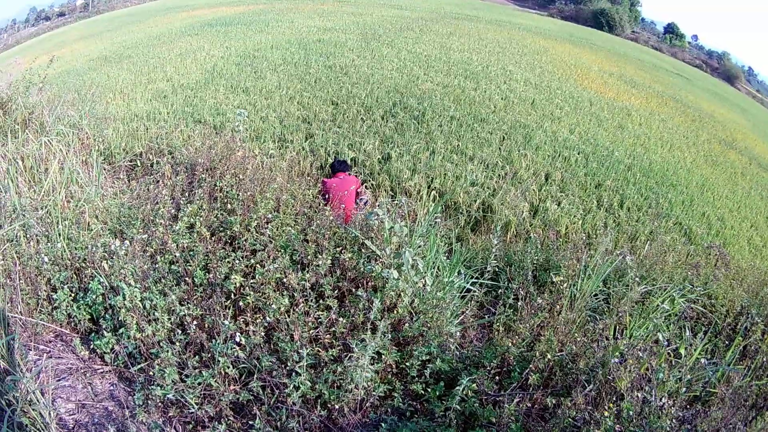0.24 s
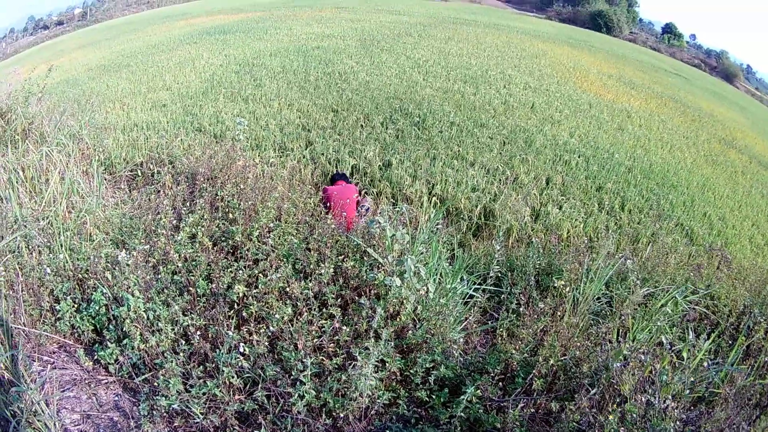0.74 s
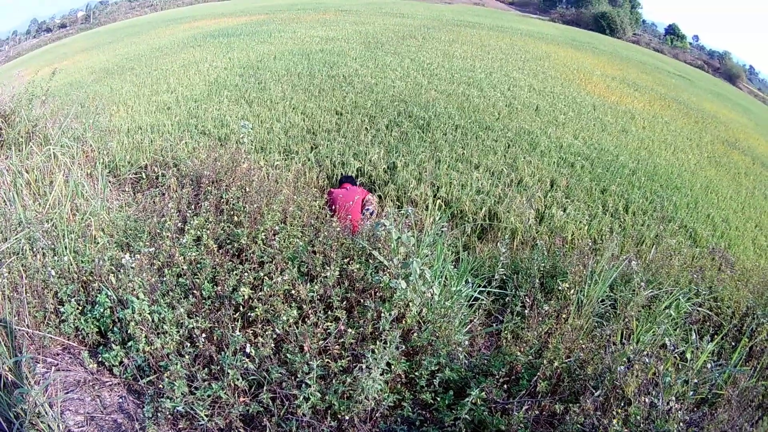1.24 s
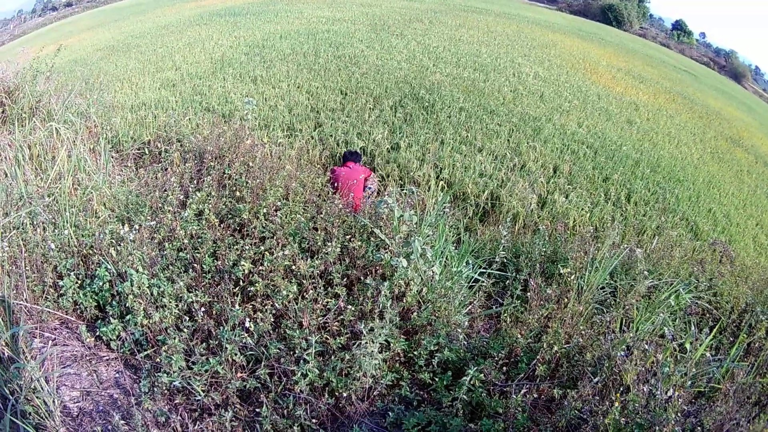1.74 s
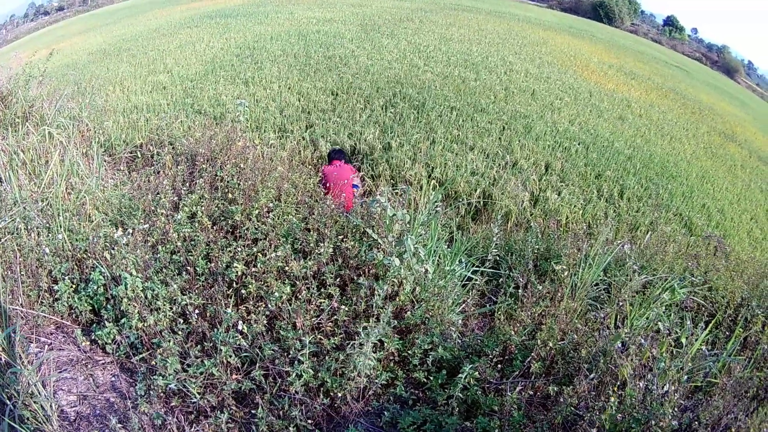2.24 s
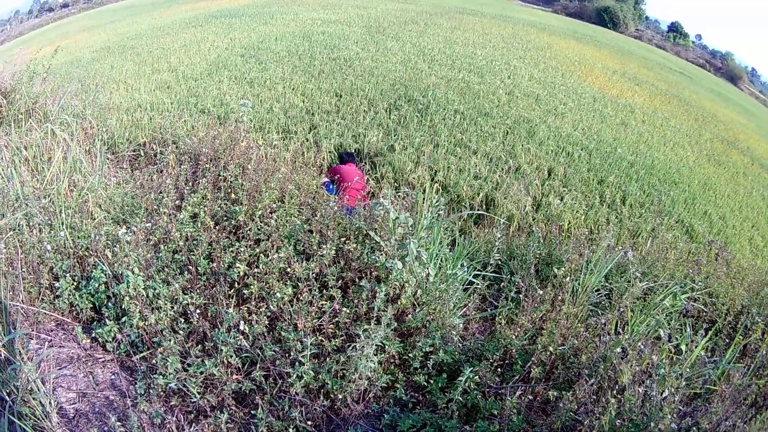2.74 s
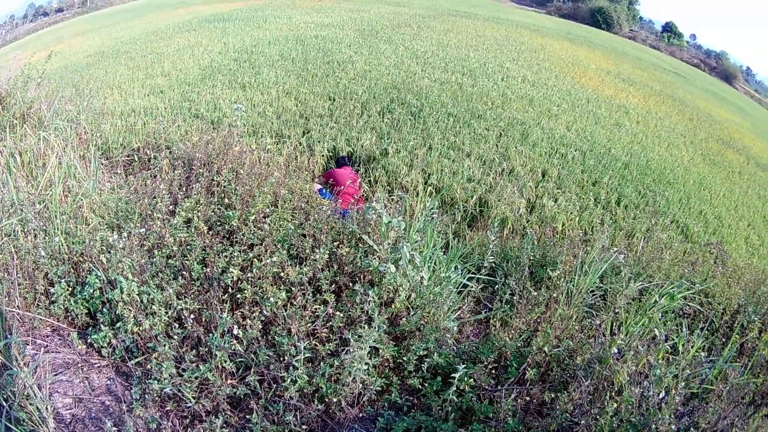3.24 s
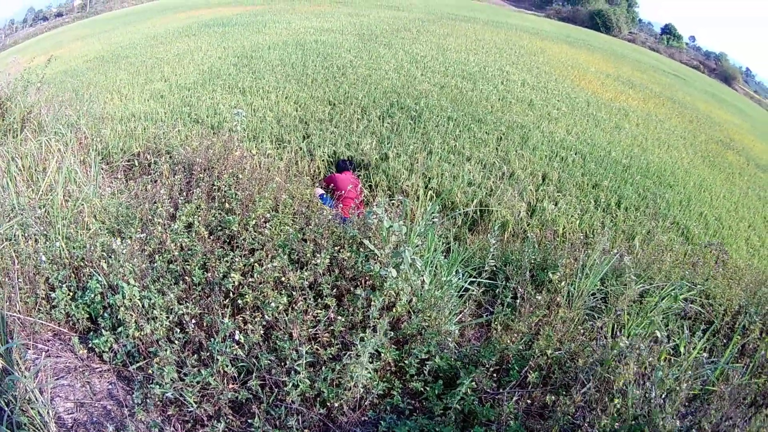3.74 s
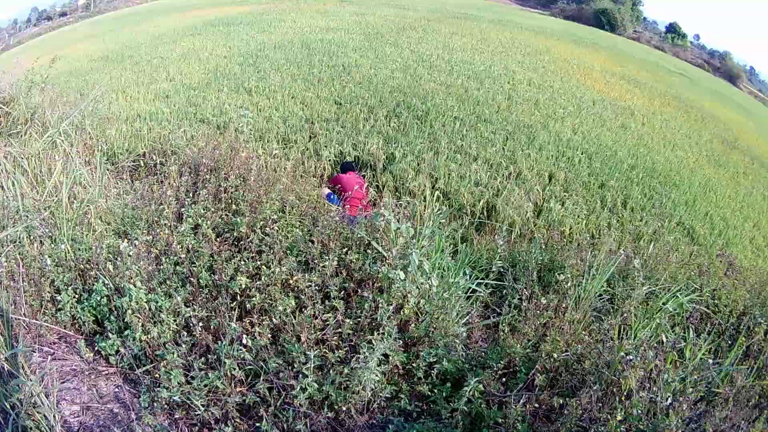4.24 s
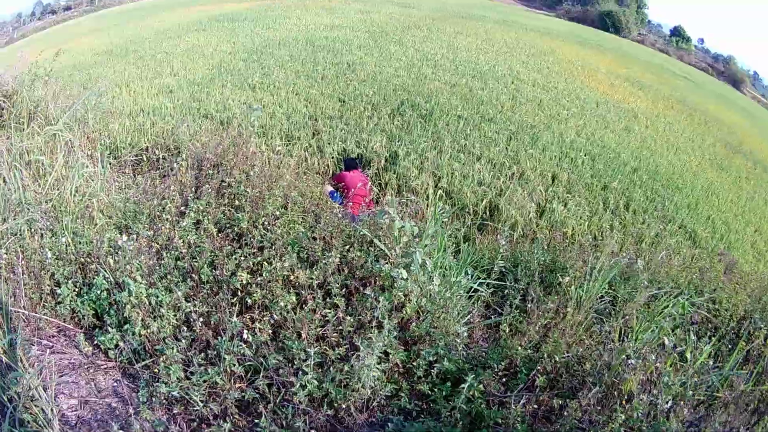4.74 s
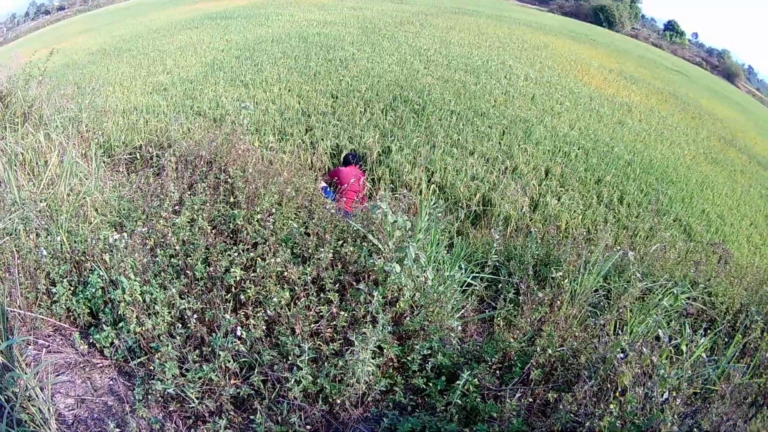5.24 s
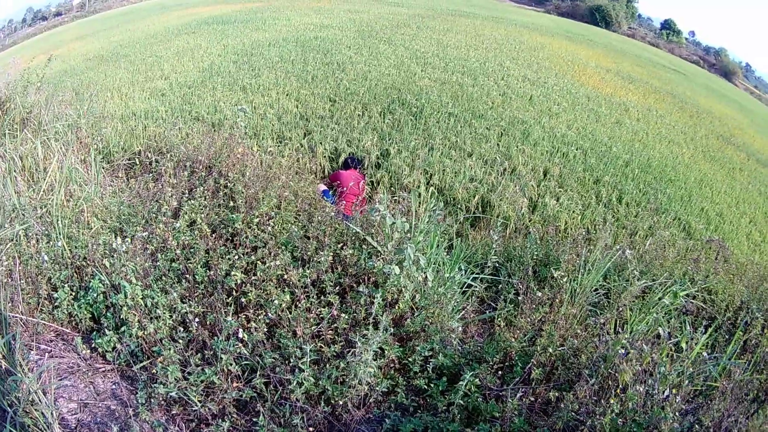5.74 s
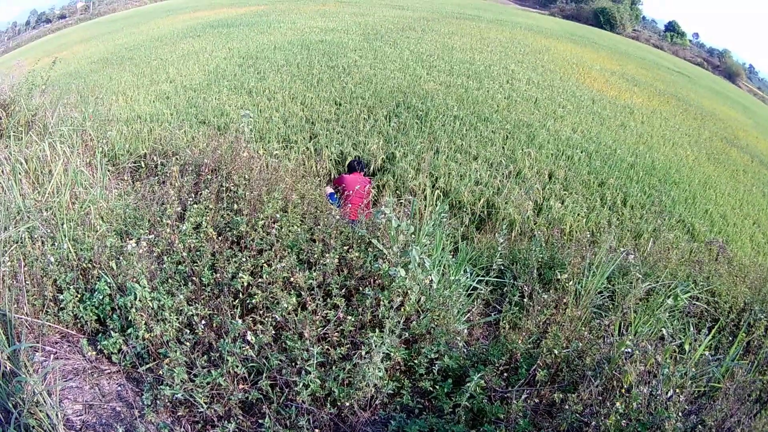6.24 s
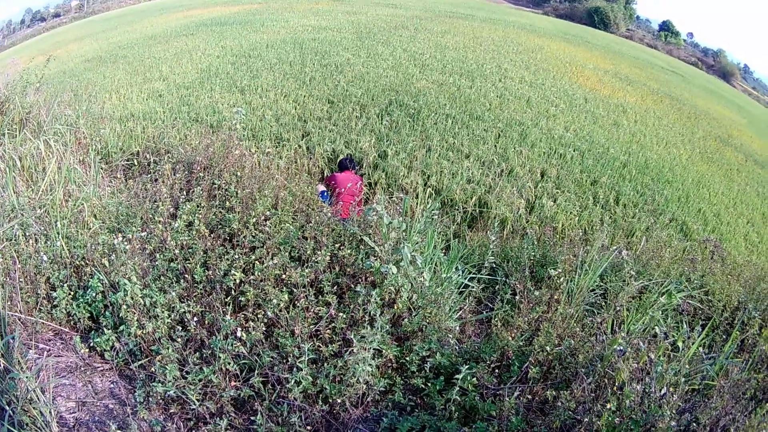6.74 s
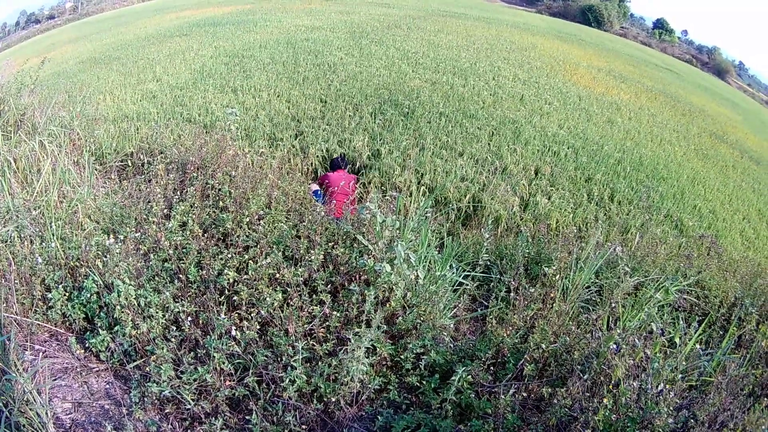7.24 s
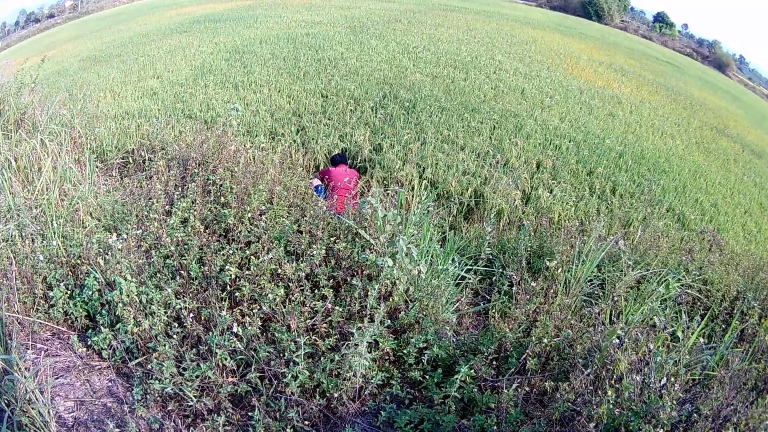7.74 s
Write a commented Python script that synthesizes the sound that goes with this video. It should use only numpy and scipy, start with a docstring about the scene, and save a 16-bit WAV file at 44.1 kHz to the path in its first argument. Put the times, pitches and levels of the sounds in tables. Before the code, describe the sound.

Close, bassy wind buffeting comes in short irregular bursts, with rounded pressure thumps and brief spits of rasping air. After the strong middle it thins out, letting faint high bird ticks, a few weak peeps and soft distant hoots show through. A thin wavering far tone rises near the end. Outdoors beside a grain field, on a small dull-sounding mono microphone.

```python
"""From the start, gusty wind over a rice field rumbles, flutters and rasps on a small camera microphone: filtered noise.
Under it lie the hush of the field and a faint rustle of stalks made of tiny clicks; far hoots slide in now and then.
A small bird ticks, mostly in pairs, as short falling notes. Soon single vortices thump as rounded pressure
peaks and grainy spits of air rasp at the port. A second bird peeps midway and later,
and near the end a thin, wavering far tone comes up.
"""
import sys
import numpy as np
from scipy import signal
from scipy.fft import rfft, irfft, next_fast_len
from scipy.io import wavfile
from scipy.ndimage import uniform_filter1d

SR = 44100
rng = np.random.default_rng(int(sys.argv[2]) if len(sys.argv) > 2 else 0)


def to_wav(sig):
    """Store sig (one row per channel, or 1-D mono) as 16-bit WAV at the path in sys.argv[1].

    Samples outside -1..1 are clipped; the rate is SR.
    """
    pcm = np.clip(np.atleast_2d(sig), -1, 1) * 32767
    pcm = np.round(pcm).astype(np.int16)
    wavfile.write(sys.argv[1], SR, pcm.T)  # frames by channels


N = 352359


def undb(db):
    """Decibels to amplitude gain."""
    return 10 ** (np.asarray(db) / 20)


def unit(x):
    """Scale to rms 1."""
    return x / np.sqrt(np.mean(x ** 2) + 1e-30)


def curves(table):
    """The columns of a table, joined by straight lines in time."""
    time_s, *columns = np.transpose(table)
    return [np.interp(np.arange(N) / SR, time_s, column) for column in columns]


def colour(x, spectrum):
    """Filter by a spectrum of (frequency [Hz], gain [dB]) points, joined along log frequency."""
    hz, db = np.transpose(spectrum)
    size = next_fast_len(len(x))
    bins_hz = np.maximum(np.arange(size // 2 + 1) * SR / size, 1)
    gain = undb(np.interp(np.log(bins_hz), np.log(hz), db))
    return irfft(rfft(x, size) * gain, size)[:len(x)]


def cut(x, hz, kind, order=2):
    """Low- or high-pass run forwards and backwards, so nothing is delayed."""
    sos = signal.butter(order, min(hz, SR / 2 - 1), kind, fs=SR, output="sos")
    return signal.sosfiltfilt(sos, x, padtype="even")


def walk(rate):
    """Random levels, `rate` new ones a second, smoothed twice; rms 1."""
    hold = max(int(SR / rate), 2)
    steps = np.repeat(rng.standard_normal(N // hold + 1), hold)
    return unit(uniform_filter1d(uniform_filter1d(steps, hold), hold)[:N])


def steady(x, span_s):
    """Hold the rms near 1 over about span_s, keeping the faster texture."""
    k = max(int(span_s * SR), 2)
    power = uniform_filter1d(uniform_filter1d(x ** 2, k), k)
    return x / np.sqrt(power + 1e-30)


def add(out, start_s, sound):
    """Mix a short sound in at a time."""
    i = int(np.clip(start_s * SR, 0, N - 1))
    out[i:i + len(sound)] += sound[:N - i]


def scatter(x, decay_s):
    """Diffuse reflections off the crop and the far trees: a decaying noise tail of unit energy."""
    age = np.arange(SR // 2) / SR
    tail = rng.standard_normal(len(age)) * np.exp(-age / decay_s)
    return signal.oaconvolve(x, tail / np.linalg.norm(tail))[:N]


def swell(start_s, length_s, attack_s=0.0082, release_s=0.0097):
    """The envelope of a gust, roll or lull: it rises, holds and drops away along tanh slopes."""
    out, begin_s = np.zeros(N), max(start_s - 0.1, 0)
    t = np.arange(begin_s - start_s, length_s + 0.1, 1 / SR)
    rise = (1 + np.tanh(t / attack_s / 2)) / 2
    drop = (1 + np.tanh((length_s - t) / release_s / 2)) / 2
    add(out, begin_s, (rise * drop) ** 2)
    return out


# The breeze between gusts: (time [s], flutter level [dB], rumble level [dB])
BREEZE_LEVELS = [(0.0, -53.5, -47.5), (0.3, -57, -49), (0.55, -51.5, -41), (0.92, -57, -46.5),
                 (1.22, -52.5, -44), (1.72, -58.5, -48.5), (1.95, -51, -41), (2.28, -49.5, -43),
                 (2.8, -41.5, -48), (2.95, -50, -41.5), (3.3, -42.5, -42), (3.85, -49.5, -45),
                 (4.4, -51, -56), (4.52, -52.5, -56.5), (4.64, -60, -50.5), (5.3, -61, -47),
                 (5.7, -58.5, -49), (6.9, -62, -45), (7.99, -60, -52)]
# Large slow eddies that only rumble: (start [s], length [s], level [dB])
SLOW_ROLLS = [(-0.005, 0.078, -41.5), (0.524, 0.17, -42.5), (0.664, 0.15, -37), (0.965, 0.073, -37.5),
              (1.205, 0.036, -39), (1.334, 0.049, -39), (2.33, 0.022, -29), (2.42, 0.11, -37),
              (2.963, 0.21, -40), (3.332, 0.19, -37), (3.695, 0.27, -40), (4.342, 0.032, -34.5),
              (4.41, 0.09, -40), (4.902, 0.12, -43), (5.103, 0.13, -40), (5.581, 0.032, -36.5),
              (5.744, 0.055, -40), (6.095, 0.11, -45), (6.3, 0.03, -43), (7.416, 0.22, -42.5)]
# Gusts that cross the port: (start [s], length [s], flutter level [dB], extra rasp [dB])
PORT_GUSTS = [(0.009, 0.074, -49, -6), (0.39, 0.052, -48, -4), (0.428, 0.023, -40.5, 0),
              (0.531, 0.16, -50.5, 6.5), (0.657, 0.11, -41.5, -1), (0.776, 0.1, -49, -6),
              (0.985, 0.2, -48.5, -3), (1.324, 0.12, -54, 4), (1.475, 0.27, -52.5, 4),
              (1.758, 0.11, -46.5, -6), (2.043, 0.069, -53.5, 15), (2.316, 0.25, -45, 2.5),
              (2.575, 0.203, -47, 8), (3.07, 0.57, -49.5, 4.5), (3.356, 0.075, -41.5, 1.5),
              (3.59, 0.15, -43.5, 2), (3.726, 0.051, -34.5, -2), (3.883, 0.18, -45.5, -0.5),
              (4.094, 0.2, -47, 0), (4.304, 0.11, -41.5, -4.5), (4.622, 0.033, -54, 7),
              (4.784, 0.14, -49, -3), (5.033, 0.057, -46, -5), (5.114, 0.079, -49, -6),
              (5.36, 0.18, -58.5, -8), (5.85, 0.12, -52.5, -7.5), (5.991, 0.14, -48, -12),
              (6.301, 0.034, -49.5, -8), (6.728, 0.021, -42.5, -5.5), (6.759, 0.22, -49.5, -7),
              (7.06, 0.098, -49, -4.5), (7.171, 0.11, -50, -6), (7.366, 0.18, -50, -13),
              (7.629, 0.11, -51.5, -9), (7.854, 0.17, -52, -15)]
# Sudden lulls; small eddies often die while large ones roll on, and a few parts rise:
# (start [s], length [s], flutter change [dB], rumble change [dB])
SUDDEN_LULLS = [(0.104, 0.11, -5, 2.5), (0.274, 0.12, -3.5, 0.5), (0.88, 0.041, -3, 0),
                (1.27, 0.049, -1, -12), (1.697, 0.04, -13, -10), (1.962, 0.07, -8, -3.5),
                (2.175, 0.044, -2, 3), (2.928, 0.045, -6, -8), (3.56, 0.038, -6.5, -12),
                (3.854, 0.033, -5, -3), (4.05, 0.05, 3.5, -11), (4.563, 0.12, -2, -2),
                (4.943, 0.041, -1, 3), (5.01, 0.022, 1, -2), (5.205, 0.12, 2, -1.5), (5.624, 0.2, -5, -3.5),
                (6.22, 0.09, -3.5, -3), (6.386, 0.14, -3, -5), (7.01, 0.045, -2, -1.5),
                (7.277, 0.049, -6, -1), (7.78, 0.064, -5.5, 1)]


def airflow(breakup=0.46):
    """Rumble, flutter and rasp levels in dB: gusts add power to the breeze, lulls shift it.
    A raspy gust has broken up its large eddies, so it rumbles less."""
    moderate_db = -50  # flutter of a moderate wind, where the two levels below apply
    gust_rumble_db, rumble_slope = -53, 0.89  # slopes: dB gained per dB of flutter
    base_rasp_db, rasp_slope = -64, 0.87
    flutter, rumble = undb(curves(BREEZE_LEVELS)) ** 2  # powers
    extra_rasp = 0
    for start_s, length_s, db, extra_db in PORT_GUSTS:
        shape = swell(start_s, length_s)
        gust_power = shape * undb(db) ** 2
        rumble_db = gust_rumble_db + rumble_slope * (db - moderate_db) - breakup * extra_db
        flutter = flutter + gust_power
        rumble = rumble + shape * undb(rumble_db) ** 2
        extra_rasp = extra_rasp + gust_power * extra_db
    for start_s, length_s, db in SLOW_ROLLS:
        rumble = rumble + swell(start_s, length_s) * undb(db) ** 2

    flutter_db, rumble_db = 10 * np.log10(flutter), 10 * np.log10(rumble)
    for start_s, length_s, flutter_change_db, rumble_change_db in SUDDEN_LULLS:
        shape = swell(start_s, length_s)
        flutter_db = flutter_db + shape * flutter_change_db
        rumble_db = rumble_db + shape * rumble_change_db
    # extra rasp is averaged over the gusts and breeze by their share of flutter power
    rasp_db = base_rasp_db + rasp_slope * (flutter_db - moderate_db) + extra_rasp / flutter
    return rumble_db, flutter_db, rasp_db


# Relative spectrum of the turbulence: (frequency [Hz], density [dB per Hz])
EDDY_SPECTRUM = [(8.8, -33), (15, -4), (36, 1.5), (68, 3), (116, -1.5), (258, -9), (412, -14.5),
                 (1460, -42), (3050, -63.5), (3960, -80), (6710, -120)]


def wind(rumble_db, flutter_db, rasp_db, span_s=0.05):
    """Turbulence on the port: large eddies break up into small ones, which come in short bursts."""
    rumble_top_hz, flutter_top_hz, deep_top_hz = 145.2, 623, 85.5
    burst_db, burst_rate = 3, 70  # spread, new levels per second
    spike_db, spike_rate = 0.5, 350
    shared, unrest_rate = 0.13, 22  # how far small eddies follow large ones; new levels per second
    slack_db, slack_slope = -3.5, 0.38

    pressure = colour(rng.standard_normal(N), EDDY_SPECTRUM)
    rumble = cut(pressure, rumble_top_hz, "low", order=3)
    rasp = cut(pressure, flutter_top_hz, "high", order=3)
    flutter = pressure - rumble - rasp
    rumble = steady(rumble, span_s)

    # small eddies are shed where a large one is strong, and add faster bursts of their own
    shedding = (uniform_filter1d(rumble ** 2, SR // 150) + 0.054) ** (shared / 2)
    bursts = shedding * undb(burst_db * walk(burst_rate))
    spikes = bursts * undb(spike_db * walk(spike_rate))
    unrest = walk(unrest_rate)

    # the further flutter falls under rumble, the more only the deepest eddies remain
    deep = cut(rumble, deep_top_hz, "low", order=3)
    thinning_db = slack_slope * np.minimum(flutter_db - rumble_db - slack_db, 0)
    rumble = deep + (rumble - deep) * undb(thinning_db)

    # each band: level, fixed trim, random unrest
    rumble_gain = undb(rumble_db + 0.96 + 1.57 * walk(unrest_rate))
    flutter_gain = undb(flutter_db - 2.0 + 1.0 * unrest)
    rasp_gain = undb(rasp_db + 0.38 - 0.2 * unrest)
    return (rumble * rumble_gain
            + steady(flutter * bursts, span_s) * flutter_gain
            + steady(rasp * spikes, span_s) * rasp_gain)


# Relative spectrum of the open field between gusts: (frequency [Hz], density [dB per Hz])
FIELD_SPECTRUM = [(40, 1.5), (200, -0.5), (500, -9), (900, -12), (1500, -12.5), (2200, -18.5), (3200, -24),
                  (4500, -26.5), (5600, -28), (7000, -30.5), (8000, -32), (12400, -32.5)]


def field(level_db=-70, flicker_db=1.4, hiss_hz=2000):
    """The hush of the whole crop and the far country swells a little, over a faint even hiss."""
    hush = unit(colour(rng.standard_normal(N), FIELD_SPECTRUM)) * undb(level_db)
    far = cut(hush, hiss_hz, "low")
    hiss = hush - far
    return far * undb(flicker_db * walk(3.4)) + hiss


def stalks(wind_db, clicks_per_s=2500, scatter_db=3, rustle_db=-89, follow=.8):
    """Dry leaves touch in countless tiny clicks, louder while a gust bends them."""
    push_db = uniform_filter1d(wind_db, SR // 5)
    touches = rng.random(N) < clicks_per_s / SR
    strength = undb(scatter_db * np.minimum(rng.exponential(size=N), 4))
    clicks = touches * rng.standard_normal(N) * strength
    leaves = colour(clicks, [(800, -10.5), (2500, -4.0), (4200, 6.0), (6500, -4), (9000, -20.0), (12000, -27.5)])
    # rustle_db holds at the strongest push
    return unit(leaves) * undb(rustle_db + follow * (push_db - push_db.max()))


# Distant hoots: (start [s], length [s], starting pitch [Hz], end pitch [Hz], peak level [dB] before roughness)
HOOT_CALLS = [(0.058, 0.05, 905, 940, -59.5), (4.63, 0.17, 870, 885, -73.5), (6.79, 0.065, 890, 935, -60),
              (7.152, 0.078, 810, 935, -57.5), (7.495, 0.075, 750, 623, -63.5)]


def hoots(waver=0.028, rough_db=3, echo_db=-6, echo_s=0.063):
    """Far calls, slightly hoarse sines, that slide to a pitch and linger over the field."""
    out, unrest = np.zeros(N), 1 + waver * walk(150)
    for start_s, length_s, start_hz, end_hz, db in HOOT_CALLS:
        u = np.linspace(0, 1, int(length_s * SR))
        slide_hz = start_hz + (end_hz - start_hz) * np.sin(np.pi / 2 * u)
        hz = slide_hz * unrest[int(start_s * SR):][:len(u)]
        tone = np.sin(2 * np.pi * np.cumsum(hz) / SR)
        add(out, start_s, undb(db) * np.sin(np.pi * u) * tone)
    out = out * undb(rough_db * walk(200))
    return out + undb(echo_db) * scatter(out, echo_s)


NOTE_LEAD_S = .02  # from the start of a note's frame to its centre


def note(hz, width_s, fall, rough):
    """A 40 ms frame holding one tiny falling note whose pitch and strength tremble."""
    t = np.arange(-SR // 50, SR // 50) / SR
    tremble = unit(cut(rng.standard_normal(len(t)), 730, "low"))
    falling_hz = hz * (1 - fall * np.tanh(t / width_s / 2))
    phase = 2 * np.pi * np.cumsum(falling_hz) / SR
    strength = np.exp(-(t / width_s) ** 2 / 2) * (1 + rough / 2 * tremble[::-1])
    return strength * np.sin(phase + rough * tremble)


def over_crop(calls, echo_db=-10, echo_s=0.024, top_hz=7700):
    """The crop scatters bird calls into a short tail; a steep low-pass dulls them."""
    return cut(calls + undb(echo_db) * scatter(calls, echo_s), top_hz, "low", order=10)


# The ticking bird's calls: (time [s], first tick's level [dB], gap to the second tick [s], 0 = a lone tick,
# second tick's level [dB]); levels before each part's own trim
TICK_CALLS = [(0.089, -78.5, .18, -77), (0.588, -70.5, .177, -73), (1.287, -67.5, .178, -69),
              (2.138, -66.5, .188, -67.5), (2.642, -67.5, .193, -68), (3.312, -68, .188, -68.5),
              (4.041, -72, 0, -99), (4.758, -70.5, .194, -72.5), (5.608, -76, 0, -99),
              (6.204, -70, .188, -74), (6.826, -74.5, .187, -77.5), (7.542, -76.5, .18, -72.5)]


def ticks():
    """Every tick as (time s, level dB, pitch Hz); the pitch sags slowly from call to call."""
    for time_s, db, gap_s, second_db in TICK_CALLS:
        hz = 4960 - 42 * time_s  # sags 42 Hz per second
        yield time_s, db, hz
        if gap_s > .1:
            yield time_s + gap_s, second_db, hz


def ticking_bird(upper_ratio=1.41, upper_db=-2, trail_db=-7, lower_db=0.6, lag_s=.0053):
    """Each tick is a rough high chip, then its faint trail together with a shorter, lower chip."""
    out = np.zeros(N)
    for time_s, db, hz in ticks():
        upper_hz = hz * upper_ratio
        upper = note(upper_hz, 0.0021, fall=0.054, rough=1.0)
        trail = note(upper_hz * .97, 0.0019, fall=0.0058, rough=0.96)
        lower = note(hz, .001, fall=0.026, rough=0.54)
        add(out, time_s + 0.00084 - NOTE_LEAD_S, undb(db + upper_db) * upper)
        add(out, time_s + lag_s - NOTE_LEAD_S, undb(db + trail_db) * trail)
        add(out, time_s + lag_s - NOTE_LEAD_S, undb(db + lower_db) * lower)
    return over_crop(out)


# Single vortices that strike the port:
# (time [s], peak level before the bass cut [dB], width scale [ms], direction [+1 push, -1 suction])
VORTICES = [(0.4056, -26.5, 1.2, 1), (0.443, -24.5, 0.75, 1), (0.6214, -29.5, 0.9, 1),
            (0.728, -26.5, 0.89, 1), (0.7439, -20.5, 0.99, 1), (0.8215, -32, 0.62, 1),
            (0.8673, -33.5, 0.9, 1), (1.002, -25, 2.5, -1), (1.0904, -35, 0.76, -1), (1.33, -23.5, 3.2, 1),
            (1.3589, -23, 3.3, -1), (1.809, -26.5, 1.3, 1), (1.8455, -31, 0.62, 1), (2.0182, -36, 0.9, 1),
            (2.1295, -18.5, 3.8, 1), (2.3316, -20, 2.8, -1), (2.4516, -27.5, 0.84, 1),
            (2.4941, -27, 1.9, -1), (2.5906, -25.5, 0.87, 1), (2.6849, -40, 0.88, 1), (2.771, -21, 1.1, 1),
            (3.0079, -19.5, 3.3, 1), (3.0432, -36.5, 0.51, -1), (3.0904, -32, 1.3, 1),
            (3.3732, -27, 0.62, 1), (3.424, -25, 1.5, 1), (3.4478, -24.5, 1.2, -1), (3.452, -18, 2.8, 1),
            (3.5173, -29.5, 0.4, 1), (3.537, -25.5, 1.9, -1), (3.741, -16, 2.3, 1),
            (3.752, -28.5, 0.34, -1), (3.8973, -31, 0.94, 1), (4.0085, -28, 0.86, -1),
            (4.1832, -30, 0.7, -1), (4.292, -26, 1.6, -1), (4.378, -21, 2.2, 1), (4.3875, -22.5, 1.8, 1),
            (4.4479, -29, 0.87, 1), (4.6296, -42, 0.42, -1), (4.903, -40, 0.44, -1),
            (5.001, -32.5, 0.74, 1), (5.0876, -29.5, 1.5, -1), (5.149, -27, 2.4, -1),
            (5.1676, -40, 0.79, -1), (5.3824, -31, 1.4, -1), (5.4308, -34.5, 0.9, -1),
            (5.4848, -30, 1.5, -1), (5.58, -27, 3, -1), (5.9184, -28.5, 1.55, 1), (6.047, -36, 0.67, 1),
            (6.0971, -27.5, 1.6, -1), (6.306, -21.5, 7.9, 1), (6.321, -36.5, 1.5, -1),
            (6.7294, -32, 1.1, 1), (6.7431, -34, 0.45, 1), (6.838, -30, 0.88, 1), (6.8606, -35, 0.62, 1),
            (6.9544, -39, 0.5, -1), (7.0955, -38, 0.72, 1), (7.112, -31, 0.68, -1), (7.245, -24.5, 1.7, 1),
            (7.422, -36, 1.1, 1), (7.6806, -32, 1.1, 1), (7.9445, -29.5, 1.6, 1)]


def buffets(port_hz=40):
    """Each vortex is one rounded peak of pressure or suction; the microphone's bass cut adds opposite swings."""
    out, t = np.zeros(N), np.arange(-SR // 20, SR // 20) / SR
    for time_s, db, width_ms, direction in VORTICES:
        peak = 1 / (1 + (t / (width_ms / 1000)) ** 2) ** (3 / 2)
        add(out, time_s + t[0], np.sign(direction) * undb(db) * peak)
    return cut(out, port_hz, "high", order=1)


# Brief spits of air across the port's edge:
# (time [s], Gaussian width [s], centre before the port dulls it [Hz], level [dB])
AIR_SPITS = [(0.441, 0.0022, 2100, -63), (0.571, 0.014, 1380, -64.5), (0.626, 0.0035, 1000, -56),
             (0.712, 0.0077, 1300, -58), (1.045, .008, 940, -63), (1.088, 0.0036, 900, -57),
             (1.137, 0.015, 1310, -59.5), (1.519, 0.0081, 1200, -56.5), (2.02, 0.0014, 1300, -59),
             (2.039, 0.0046, 1370, -54.5), (2.175, 0.0097, 1320, -57.5), (2.293, 0.0079, 1300, -54),
             (2.372, 0.0073, 1470, -58), (2.399, 0.0017, 1480, -58), (2.417, 0.0012, 1500, -60),
             (2.452, 0.01, 1200, -58), (2.482, 0.021, 1360, -56.5), (2.512, 0.0066, 790, -52),
             (2.63, 0.027, 1390, -59), (2.66, 0.013, 890, -64), (2.724, 0.0046, 900, -56),
             (2.768, 0.0061, 596, -53), (3.047, 0.0072, 700, -58), (3.156, 0.0051, 1600, -60),
             (3.21, 0.03, 1250, -58.5), (3.369, 0.0053, 900, -51.5), (3.435, 0.0062, 1120, -53.5),
             (3.545, 0.013, 1220, -57), (3.75, 0.0077, 1120, -52.5), (3.904, 0.0017, 1300, -65.5),
             (3.925, .01, 735, -52.5), (4.007, 0.0044, 750, -58), (4.056, .008, 1590, -60),
             (4.125, 0.019, 704, -59), (4.179, 0.0049, 646, -69), (4.371, 0.0032, 650, -54),
             (4.392, 0.0074, 860, -57), (4.446, 0.0041, 650, -67), (5.003, 0.0022, 900, -61),
             (5.172, 0.017, 840, -66), (6.84, 0.038, 790, -68), (7.123, 0.0082, 725, -56),
             (7.235, .01, 980, -67), (7.42, 0.0066, 800, -65.5), (7.663, 0.0044, 1880, -66)]
# The port dulls each spit: (frequency [Hz], relative gain [dB])
PORT_DULLING = [(1000, 7), (1800, -5.5), (2400, -12.5), (3200, -15), (4500, -22), (8000, -42.5)]


def spits(grain_db=3, grain_rate=500, below_db=-14, above_db=-9):
    """The fastest air tears at the port's edge in short, grainy rasps, each with its own brightness."""
    out, t = np.zeros(N), np.arange(-SR // 10, SR // 10) / SR
    air = rng.standard_normal(N) * undb(grain_db * walk(grain_rate))
    for time_s, width_s, hz, db in AIR_SPITS:
        shape = np.exp(-np.minimum((t / width_s) ** 2 / 2, 20))
        spectrum = [(hz / 8, 2 * below_db), (hz / 2.5, below_db), (hz, 0), (hz * 2, above_db), (hz * 4, 2 * above_db)]
        burst = shape * air[int((time_s + t[0]) * SR):][:len(t)]
        rasp = colour(colour(burst, spectrum), PORT_DULLING)
        # filtering must not change a spit's energy
        add(out, time_s + t[0], undb(db) * rasp * np.linalg.norm(shape) / np.linalg.norm(rasp))
    return out


# The second bird's peeps: (time [s], Gaussian width [s], pitch [Hz], level [dB])
PEEP_CALLS = [(4.086, 0.0027, 4300, -72.5), (6.368, 0.007, 4100, -82), (6.386, .004, 4260, -80)]


def peeping_bird():
    """A second bird's peeps are single, slightly rough falling notes."""
    out = np.zeros(N)
    for time_s, width_s, hz, db in PEEP_CALLS:
        add(out, time_s - NOTE_LEAD_S, undb(db) * note(hz, width_s, fall=0.031, rough=.3))
    return over_crop(out)


# Distant whine: (time [s], rms level before flicker [dB])
WHINE_LEVELS = [(5.9, -102), (6.4, -91), (6.75, -82.5), (7.08, -82), (7.2, -83.5), (7.35, -80), (7.42, -82),
                (7.48, -77.5), (7.56, -78), (7.63, -87), (7.8, -85), (7.99, -87)]


def whine(start_hz=1589, sag_hz_per_s=22, waver=.008, flicker_db=1.5):
    """A thin far tone that sinks a little and wavers on the wind."""
    since_start_s = np.maximum(np.arange(N) / SR - WHINE_LEVELS[0][0], 0)
    hz = (start_hz - sag_hz_per_s * since_start_s) * (1 + waver * walk(110))
    tone = unit(np.sin(2 * np.pi * np.cumsum(hz) / SR))
    return tone * undb(curves(WHINE_LEVELS)[0] + flicker_db * walk(20))


def scene():
    """Wind on the port in front of the quiet field."""
    rumble_db, flutter_db, rasp_db = airflow()
    air = wind(rumble_db, flutter_db, rasp_db) + buffets() + spits()
    surroundings = field() + stalks(flutter_db) + hoots() + whine()
    birds = ticking_bird() + peeping_bird()
    return (air + surroundings + birds)[None]


def record(dry, top_hz=12500):
    """The camera cuts the top with a steep elliptic low-pass."""
    return signal.sosfilt(signal.ellip(8, .2, 70, top_hz, fs=SR, output="sos"), dry)


dry = scene()
out = record(dry)
to_wav(out)
```